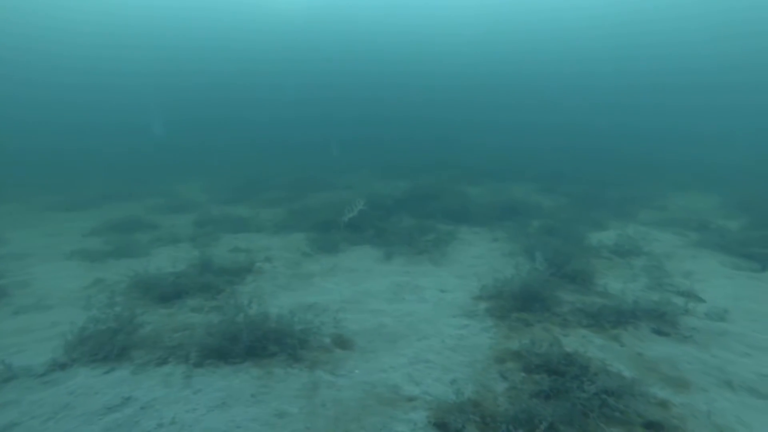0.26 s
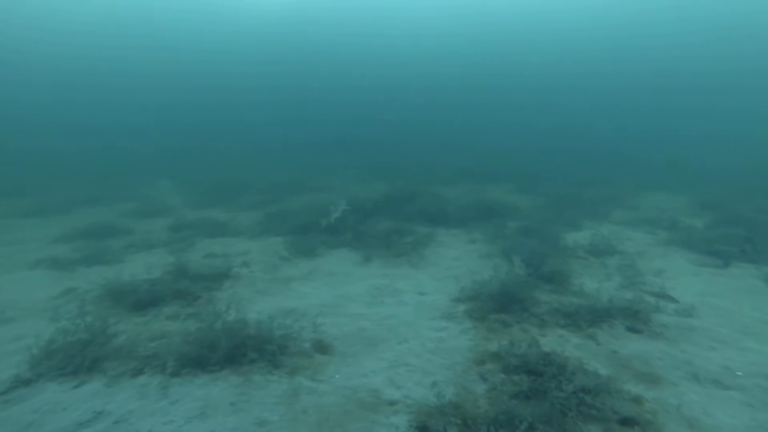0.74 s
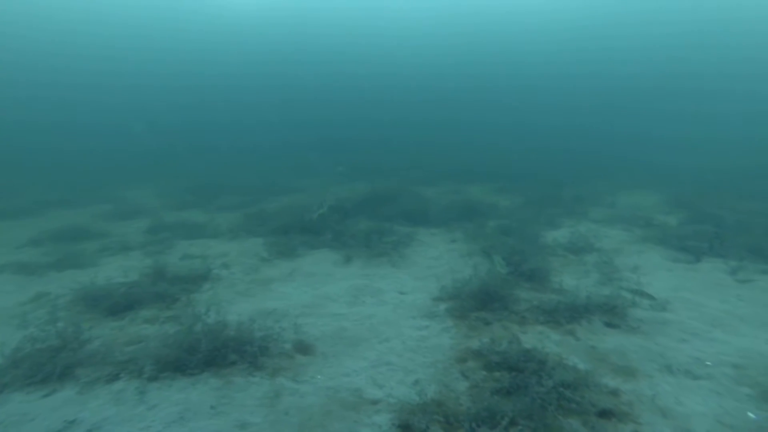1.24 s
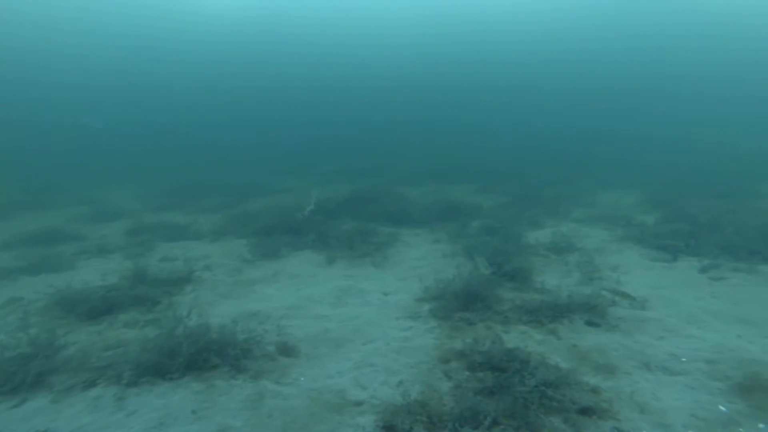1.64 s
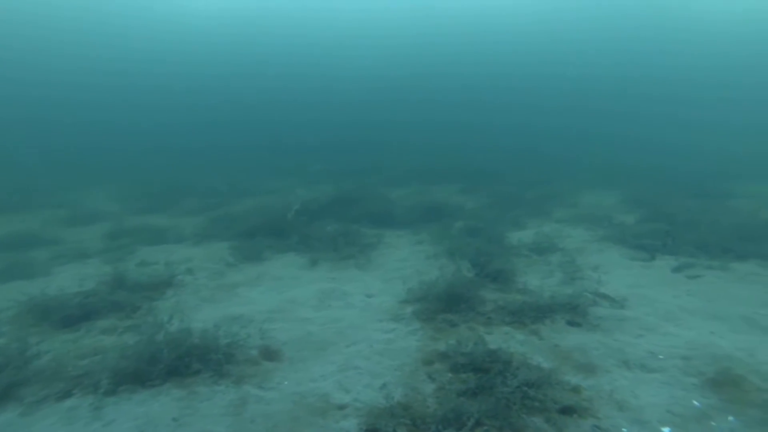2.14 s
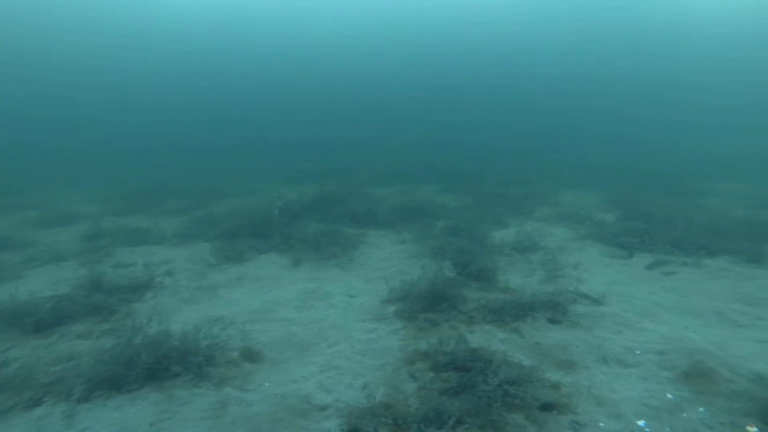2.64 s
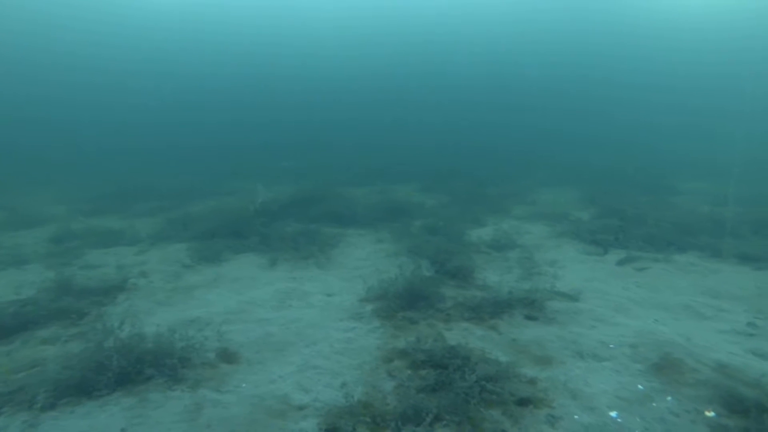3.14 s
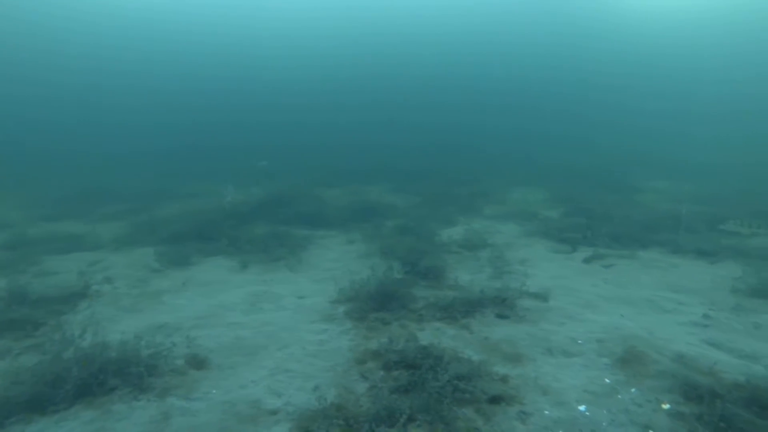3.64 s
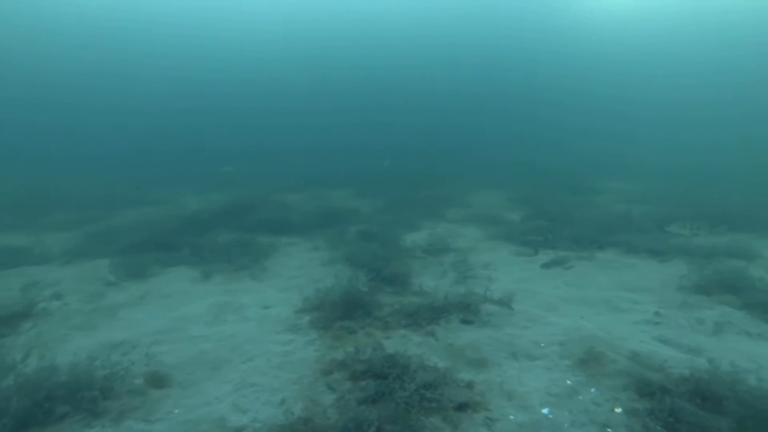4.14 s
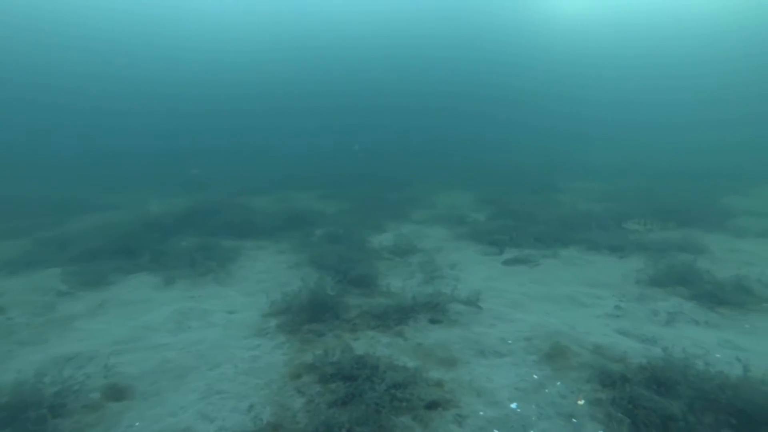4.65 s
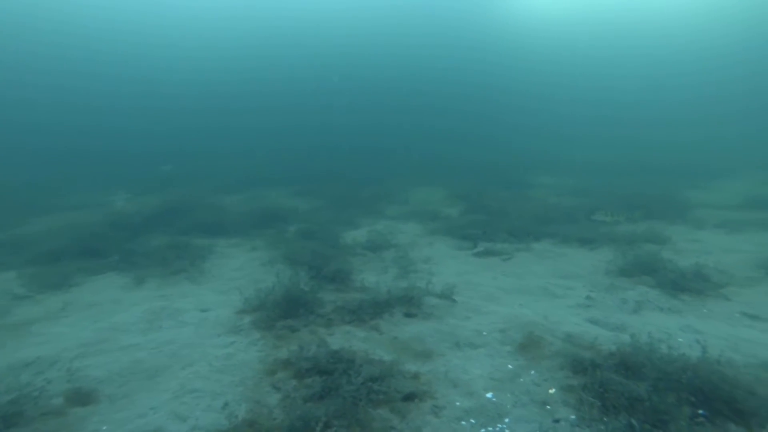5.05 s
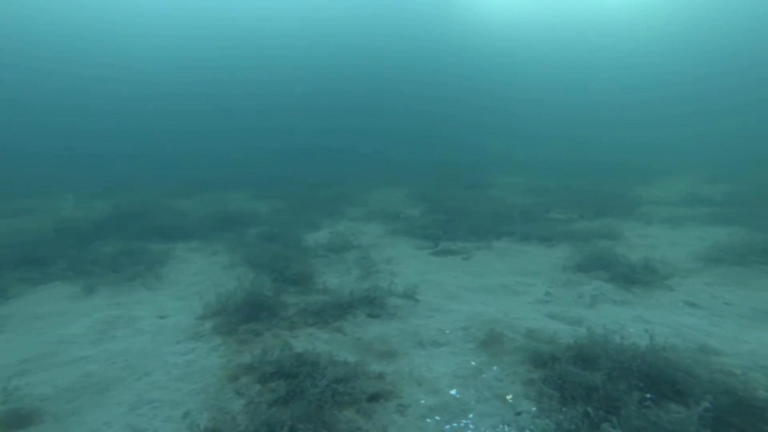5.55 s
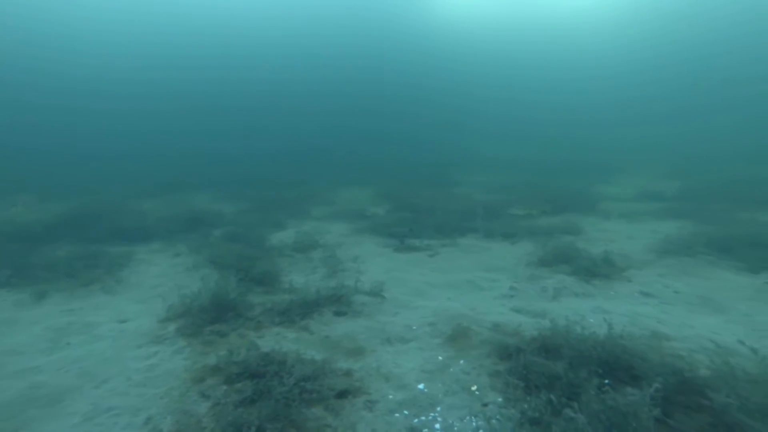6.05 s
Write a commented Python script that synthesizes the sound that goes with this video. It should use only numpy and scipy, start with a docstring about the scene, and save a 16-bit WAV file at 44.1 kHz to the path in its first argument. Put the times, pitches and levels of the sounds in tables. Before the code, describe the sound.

A submerged camera drifts through near-silence: soft knocks, sparse sharp ticks, popping bubbles, faint washes of water, and one late cluster of bumps and clacks.

```python
"""Drifting under the ice

A camera in a watertight housing drifts over a weedy lake bed under ice, in faint hiss and rumble.
Contacts excite damped modes: dull knocks and a juddering bump on the housing, clacks of its mount,
and a few sharp ticks in the water, probably from the ice, with one duller clack among them.
Friction noise drives the wash and rustles. Shaped noise makes the scrapes, sizzle, rumble and hiss;
low damped sines make the jolts. Two bubbles pop close by, each a noise snap and a few short modes."""
import sys
import numpy as np
from scipy import signal
from scipy.fft import rfft, irfft, next_fast_len
from scipy.io import wavfile
from scipy.ndimage import map_coordinates

SR = 44100
rng = np.random.default_rng(int(sys.argv[2]) if len(sys.argv) > 2 else 0)


def to_wav(sig):
    """Store sig (one row per channel, or 1-D mono) as 16-bit WAV at the path in sys.argv[1].

    Samples outside -1..1 are clipped; the rate is SR.
    """
    pcm = np.clip(np.atleast_2d(sig), -1, 1) * 32767
    pcm = np.round(pcm).astype(np.int16)
    wavfile.write(sys.argv[1], SR, pcm.T)  # frames by channels


N = 277389  # length in samples


def amp(db):
    """Logarithmic level: decibels to linear gain."""
    return 10 ** (np.asarray(db) / 20)


def unit(x):
    """Normalisation: the signal scaled to rms 1."""
    return x / np.sqrt(np.mean(x ** 2) + 1e-20)


def noise():
    """White noise: equal power at all frequencies, over the whole scene."""
    return rng.standard_normal(N)


def wobble(rate):
    """Slow random modulation: a smooth curve through rate random knots a second."""
    knots = rng.standard_normal(int(N * rate / SR) + 4)
    return map_coordinates(knots, [np.arange(N) * rate / SR])


def filtered(x, response):
    """Linear filtering: the spectrum of x times a response of frequency."""
    size = next_fast_len(N + SR // 2)
    spectrum = rfft(x, size) * response(np.fft.rfftfreq(size, 1 / SR))
    return irfft(spectrum, size)[:N]


def coloured(x, spectrum):
    """Spectral shaping: x weighted by (Hz, dB) points on a log frequency axis, at rms 1."""
    hz_points, db_points = np.transpose(spectrum)

    def response(hz):
        return amp(np.interp(np.log(hz + 1), np.log(hz_points), db_points))
    return unit(filtered(x, response))


def add(track, s, sound):
    """Superposition: mix a sound into the track at time s."""
    part = track[round(s * SR):][:len(sound)]
    part += sound[:len(part)]


def ring(modes):
    """Modal decay: damped sines of alternating sign, so that the ring takes a moment to build."""
    t = np.arange(SR // 4) / SR
    total = np.zeros(len(t))
    for k, (hz, db, t60) in enumerate(modes):
        total += (-1) ** k * amp(db - 60 * t / t60) * np.sin(2 * np.pi * hz * t)
    return total


def blows(events, modes, rub):
    """Impact excitation: a push and a short rough rub; a soft contact leaves high modes still."""
    track, body = np.zeros(N), ring(modes)
    t = np.arange(len(body)) / SR
    for s, db, bright_hz, t60 in events:
        push = t == 0
        # the longer the rub, the more it outweighs the push
        force = push + rub * rng.standard_normal(len(t)) * amp(-60 * t / t60)
        force = signal.lfilter([1], [1, -np.exp(-2 * np.pi * bright_hz / SR)], force)
        sound = signal.fftconvolve(force, body)
        # strength is the blow's energy, as an rms over 10 ms
        strength = np.sqrt(np.sum(sound ** 2) / (SR / 100))
        add(track, s, amp(db) * sound / strength)
    return track


def rubbed(modes, grain_db):
    """Friction excitation: uneven rubbing keeps a set of modes ringing, at rms 1."""
    friction = noise() * amp(grain_db * wobble(120))
    return unit(signal.fftconvolve(friction, ring(modes))[:N])


def swells(events, rise_s, fall_s):
    """Exponential envelope: the gain of events that grow and fade; a third column stretches time."""
    gain = np.zeros(N)
    for s, db, *stretch in events:
        t = (np.arange(N) / SR - s) / np.prod(stretch)
        gain += amp(db) * np.exp(-np.abs(t) / np.where(t < 0, rise_s, fall_s))
    return gain


# Modes of the housing. Each row: frequency in Hz, relative level in dB, t60 in seconds.
HOUSING = [(290, -14.5, 0.097), (377, -8, 0.055), (459, -8, 0.06), (720, 1, 0.054), (906, -13, 0.049),
           (1141, -8, 0.066), (1570, -3.5, 0.018), (2600, -16, 0.025), (3240, -11, .01)]
# Dull knocks on the housing. Each row: start in seconds, strength in dB, contact brightness in Hz,
# rub t60 in seconds.
KNOCKS = [(.612, -63, 2000, 0.033), (.719, -49.5, 2000, 0.061), (1.9565, -52.5, 1200, 0.0078),
          (1.961, -46, 1000, 0.037), (2.336, -56.5, 2500, 0.072), (2.7535, -49.5, 2490, 0.008),
          (2.7563, -49.5, 2020, 0.035), (3.187, -53.5, 2500, 0.038), (4.0105, -55.5, 4000, 0.014),
          (4.1505, -48, 4000, 0.0092), (4.898, -52, 200, 0.16), (6.256, -47, 2520, 0.17)]


def knocks():
    """Impact on a resonant shell: each contact sets the housing's modes ringing."""
    return blows(KNOCKS, HOUSING, rub=0.12)


BUMP_S, BUMP_DB, BUMP_HZ = 4.8465, -34.5, 1300  # first contact: time, strength before muffling, brightness
MUFFLE_HZ = 990  # low-pass corner set by the bump's softness
JUDDER_GAP_S, JUDDER_T60 = .0109, 0.03  # time between contacts, rub of each
JUDDER_LOSS_DB = 1.3  # loss at the second contact; it grows as the square of the count


def judder(count=4):
    """Chatter: a soft, heavy bump makes evenly spaced contacts, each weaker than the last."""
    contacts = []
    for k in range(count):
        strength_db = BUMP_DB - JUDDER_LOSS_DB * k ** 2
        contacts.append((BUMP_S + k * JUDDER_GAP_S, strength_db, BUMP_HZ, JUDDER_T60))
    bump = blows(contacts, HOUSING, rub=0.088)
    return signal.lfilter(*signal.butter(2, MUFFLE_HZ, fs=SR), bump)


# Modes of the mount. Each row: frequency in Hz, relative level in dB, t60 in seconds.
MOUNT = [(360, -8.5, 0.047), (536, -20.5, 0.061), (700, -29, 0.018), (928, -4, 0.029), (1227, 2, 0.018),
         (1460, 3, 0.016), (1660, -7.5, 0.04), (1930, -1.5, 0.019), (2230, -35, 0.019), (2920, -21, 0.03),
         (4660, -13, 0.0096), (6540, -15, 0.0027)]
# Clacks of the mount. Each row: start in seconds, strength in dB, contact brightness in Hz,
# rub t60 in seconds.
CLACKS = [(2.1255, -59, 5000, 0.0049), (2.769, -56, 3970, 0.016), (5.0513, -44, 5000, 0.0075),
          (5.0533, -31, 4000, 0.0025), (5.0553, -33.5, 3000, 0.023), (5.0845, -51, 2980, 0.0098),
          (5.101, -47.5, 10000, 0.042), (5.1128, -46, 4030, 0.048), (5.2408, -41.5, 1230, 0.022)]


def clacks():
    """Impact of hard parts: mostly bright contacts set the mount's modes ringing."""
    return blows(CLACKS, MOUNT, rub=0.11)


# Slow pushes of water as the camera is jolted. Each row: start in seconds, level at the onset of
# the decay in dB, frequency in Hz.
JOLTS = [(4.944, -39, 45), (5.048, -35.5, 79), (5.068, -31, 44), (5.236, -35, 45), (5.788, -38, 69)]


def jolts(t60=0.043):
    """Damped oscillation: a jolt moves the water for a few cycles at most."""
    track = np.zeros(N)
    for s, db, hz in JOLTS:
        add(track, s, ring([(hz, db, t60)]))
    return track


# Something scraping along the housing. Each row: start in seconds, length in seconds, final level
# in dB, release t60 in seconds.
SCRAPES = [(4.007, 0.15, -52, .17), (4.84, 0.018, -51, 0.036)]
CATCH_S, PRESS_DB_PER_S = 0.0044, 49  # a scrape catches quickly, then grows
# Spectrum of a scrape. Each row: frequency in Hz, relative density in dB per Hz.
BRISTLES = [(150, -1), (300, 1.5), (450, 1.5), (560, -1), (720, 6.5), (950, -15), (1150, 2), (1500, -8),
            (1850, -10), (2200, 2.5), (2570, -0.5), (3500, -14.5), (6700, -21), (10000, -38)]


def brush(grain_db=2.5):
    """Stick and slip: many tiny slips in clumps make a scrape, which presses harder until it lets go."""
    slips = noise() * amp(grain_db * wobble(300))
    pressure = np.zeros(N)
    for s, length, db, t60 in SCRAPES:
        t = np.arange(N) / SR - s
        growth = PRESS_DB_PER_S * (t - length)
        release = -60 * (t - length) / t60
        pressure += np.clip(t / CATCH_S, 0, 1) * amp(db + np.minimum(growth, release))
    return pressure * coloured(slips, BRISTLES)


# The mount shifting and rustling. Each row: time of the peak in seconds, peak level in dB, length
# as a multiple of the usual.
STIRS = [(2.812, -60, 2), (3.272, -64, 1), (4.262, -64, 1.5), (4.357, -57, 1.5), (4.975, -57, 3),
         (5.145, -62, 1.5), (5.82, -61.5, 1), (6.04, -62, 1)]


def stirs(rise_s=0.0095, fall_s=0.011):
    """Friction-driven resonance: the mount rustles in brief soft swells."""
    return swells(STIRS, rise_s, fall_s) * rubbed(MOUNT, grain_db=6.5)


# Modes of the two bubbles. Each row: frequency in Hz, level in dB, t60 in seconds.
BIG_BUBBLE = [(521, -19.5, 0.02), (710, -14.5, 0.012), (834, -27, 0.033), (1137, -15.5, 0.016),
              (1345, -15.5, 0.053), (1615, -25, 0.026), (2125, -26.5, .012), (3110, -31, 0.0054),
              (4020, -37.5, 0.011), (5000, -39, 0.0072)]
SMALL_BUBBLE = [(1285, -43.5, 0.026), (2160, -32, 0.013), (2310, -30.5, 0.0094), (3300, -48, .012)]
# The pops. Each row: start in seconds, modes of the bubble.
BUBBLES = [(0.9029, SMALL_BUBBLE), (0.9818, BIG_BUBBLE)]


def bubbles(snap_db=-22, snap_t60=0.00075):
    """Bubble resonance: each breaks with a tiny snap and rings briefly; a low-pass softens its onset."""
    track = np.zeros(N)
    for s, modes in BUBBLES:
        pop = ring(modes)
        t = np.arange(len(pop)) / SR
        snap = amp(snap_db - 60 * t / snap_t60) * rng.standard_normal(len(t))
        add(track, s, pop + np.abs(pop).max() * snap)  # snap level is relative to the pop's peak
    return signal.lfilter(*signal.butter(2, 5800, fs=SR), track)


# Modes of the ticks. Each row: frequency in Hz, relative level in dB, t60 in seconds.
ICE = [(800, -11.5, 0.012), (1530, 1, 0.017), (2180, -5.5, 0.012), (2640, -3, 0.021), (3240, -3.5, 0.0075),
       (4100, -6.5, 0.011), (5000, -1, 0.0068), (6000, -8, 0.0045), (7420, -5.5, 0.0081),
       (10500, -4, 0.0024), (12300, -13.5, .004)]
# Sharp near ticks, and at 4.59 s a duller clack. Each row: start in seconds, strength in dB,
# contact brightness in Hz, crackle t60 in seconds.
TICKS = [(.8605, -61, 8000, 0.0096), (1.2235, -64, 4000, .006), (2.397, -44, 12000, 0.022),
         (4.307, -65.5, 5000, 0.017), (4.5897, -53, 1300, 0.0089)]
# Spurts of sizzle that trail the loudest tick. Each row: time of the peak in seconds, peak level in dB.
SIZZLES = [(2.402, -57), (2.427, -58)]
SIZZLE_RISE_S, SIZZLE_FALL_S = .003, 0.01  # time constants
# Spectrum of the sizzle. Each row: frequency in Hz, relative density in dB per Hz.
SIZZLE = [(1000, -7), (3500, -13), (5200, -2), (7500, -14), (13000, -22)]


def ice(far_rate=6, far_db=-66, scatter_db=3):
    """Impulsive excitation: near ticks and a duller clack, a sizzle, and faint far ticks at random."""
    near = blows(TICKS, ICE, rub=0.19)
    sizzle = swells(SIZZLES, SIZZLE_RISE_S, SIZZLE_FALL_S) * coloured(noise(), SIZZLE)
    # far_rate is the mean number of far ticks a second
    impulses = (rng.random(N) < far_rate / SR) * amp(far_db + scatter_db * noise())
    tick = ring(ICE)
    far = signal.fftconvolve(impulses, tick / np.abs(tick).max())[:N]
    return near + sizzle + far


# Surges of water past the housing. Each row: time of the peak in seconds, peak level in dB, length
# as a multiple of the usual.
SURGES = [(.265, -63, 1.1), (1.53, -63, 1), (2.04, -54, .35), (3.68, -64, .7), (4.44, -61.5, .6),
          (5.39, -63, 1), (6.04, -69, 1)]
SURGE_RISE_S, SURGE_FALL_S = 0.071, 0.092  # time constants of a usual surge
FLOW_DB = -78  # the steady flow between surges


def wash():
    """Flow-induced vibration: a faint steady flow and its surges ring the housing."""
    surges = swells(SURGES, SURGE_RISE_S, SURGE_FALL_S)
    flow = np.hypot(amp(FLOW_DB), surges)  # powers add
    return flow * rubbed(HOUSING, grain_db=3)


# Spectra of the rumble and the hiss. Each row: frequency in Hz, relative density in dB per Hz.
RUMBLE = [(10, -1), (28, 1), (45, -5), (90, -7.5), (160, -15), (300, -19.5), (600, -26.5), (1200, -46.5),
          (2500, -93)]
HISS = [(100, 6.5), (700, 4), (1550, 3), (2200, -0.5), (2650, 1.5), (3020, 6.5), (3650, -4), (5100, -4),
        (6300, -8), (8500, -11.5), (10000, -9.5), (11400, -16), (12700, -14.5), (15200, -18)]


def background(rumble_db=-58.0, hiss_db=-65, unrest_db=2.5, lumps_db=1.5):
    """Broadband noise: a restless, lumpy rumble of the water under an even hiss."""
    level_db = rumble_db + unrest_db * wobble(4.96) + lumps_db * wobble(25)
    rumble = coloured(noise(), RUMBLE) * amp(level_db)
    hiss = amp(hiss_db) * coloured(noise(), HISS)
    return rumble + hiss


def scene():
    """Superposition: the pressures of all sources add at one microphone."""
    contacts = knocks() + judder() + clacks() + jolts() + brush() + stirs()
    water = bubbles() + ice() + wash() + background()
    return (contacts + water)[None]


TOP_HZ = 15290  # the camera's band limit


def record(dry):
    """Band limiting: the camera keeps nothing above its band limit."""
    return filtered(dry[0], lambda hz: hz < TOP_HZ)[None]


dry = scene()
out = record(dry)
to_wav(out)
```